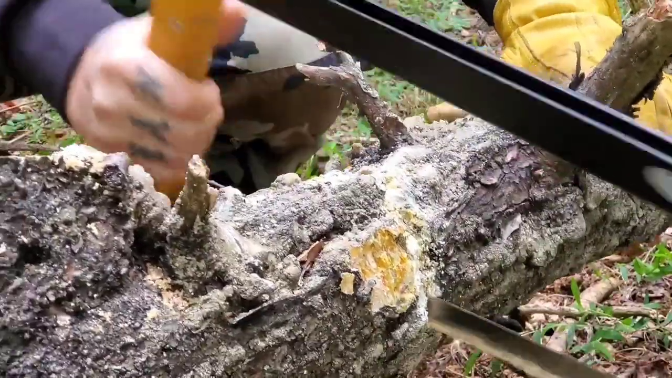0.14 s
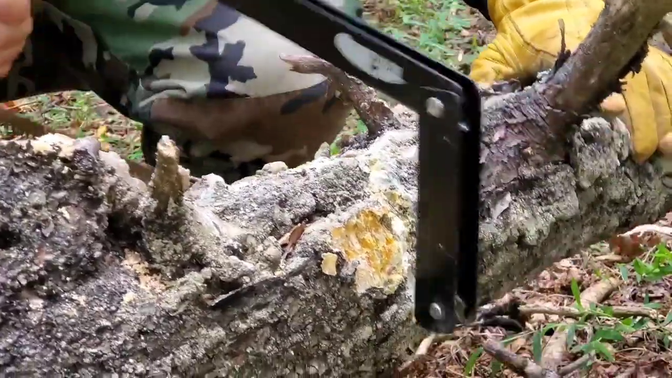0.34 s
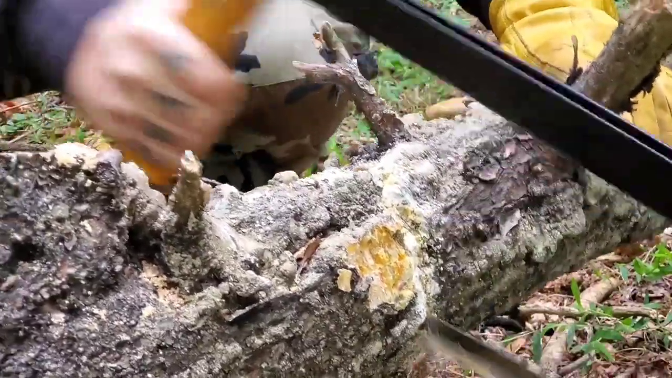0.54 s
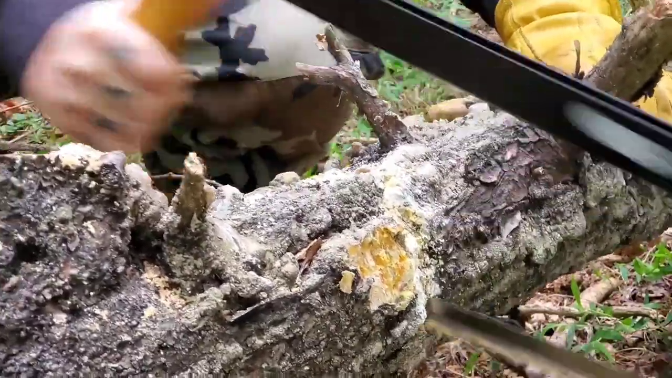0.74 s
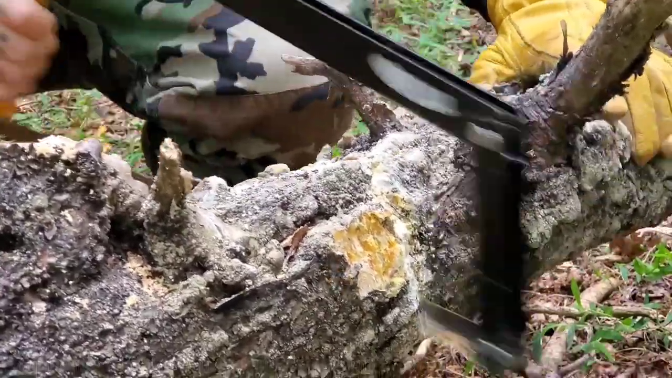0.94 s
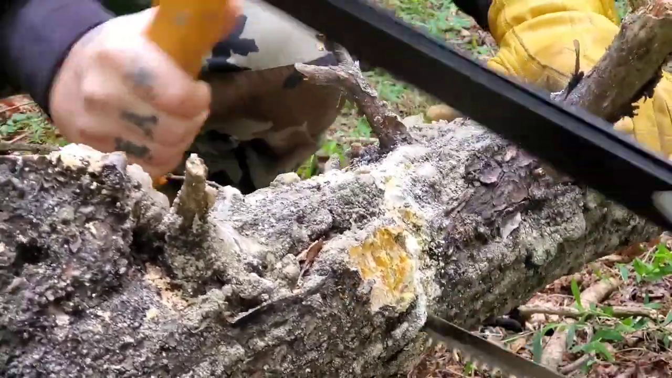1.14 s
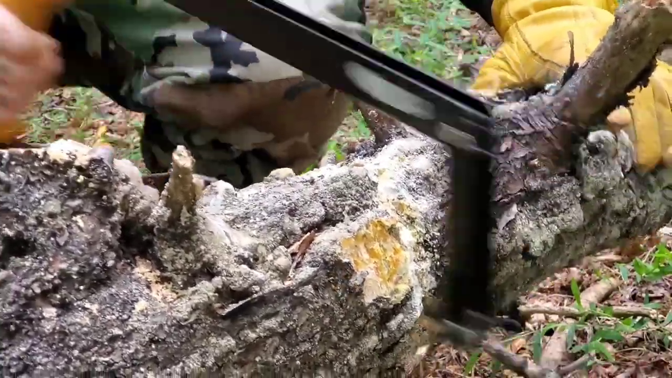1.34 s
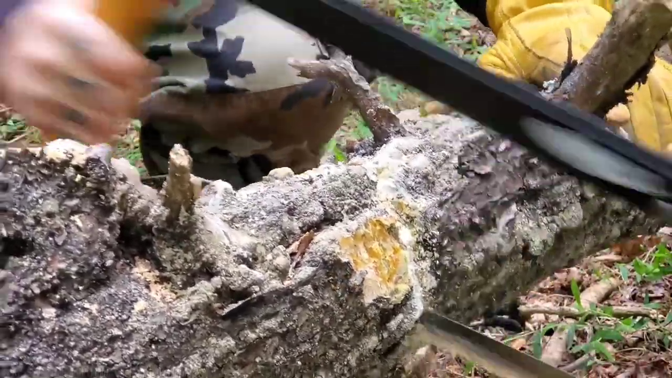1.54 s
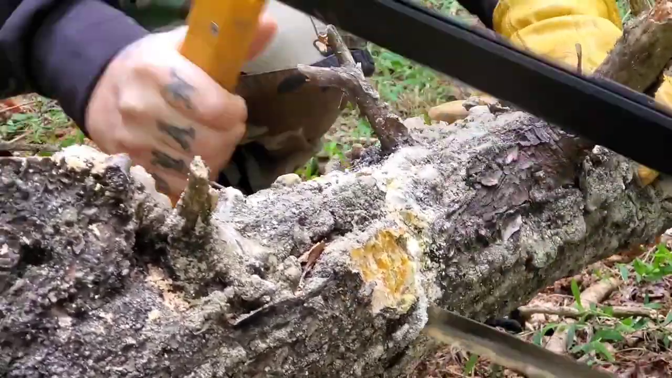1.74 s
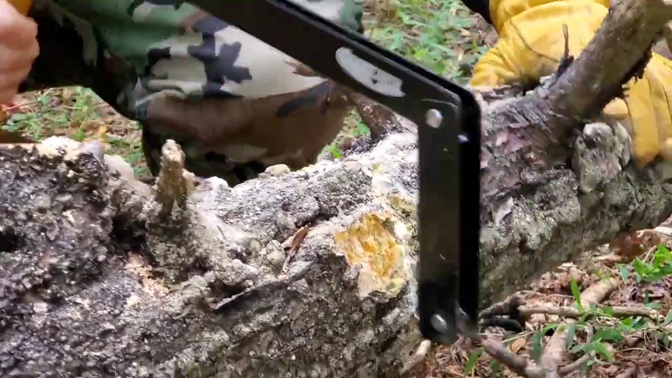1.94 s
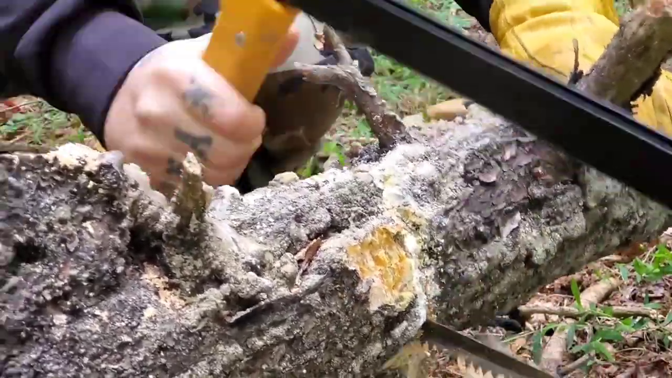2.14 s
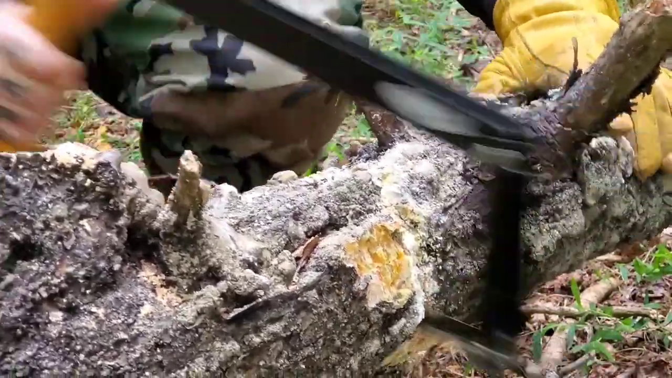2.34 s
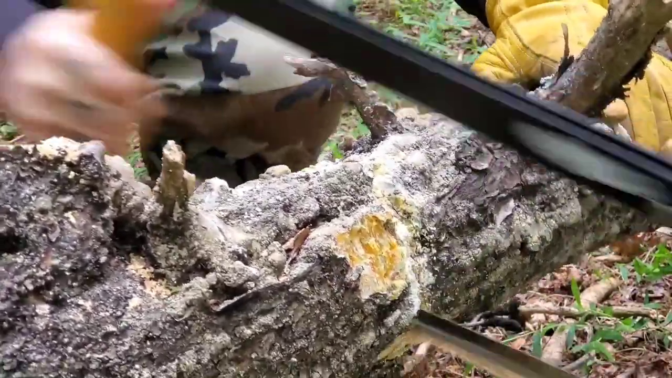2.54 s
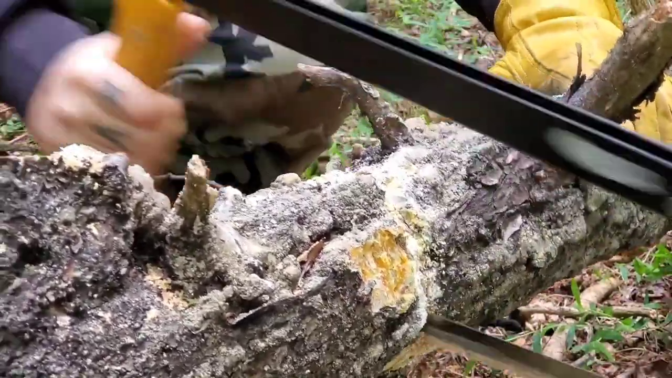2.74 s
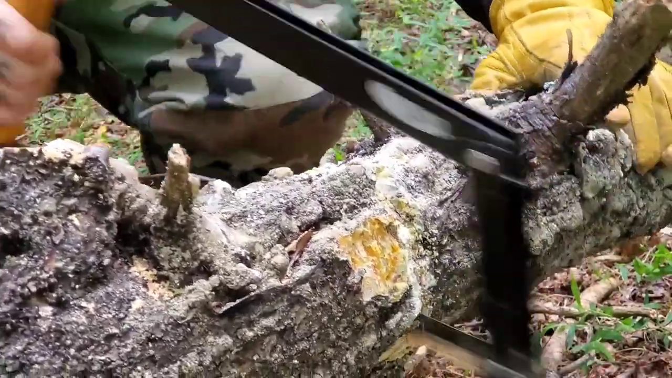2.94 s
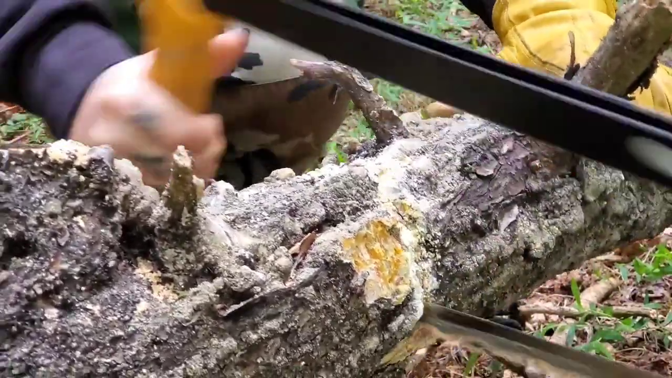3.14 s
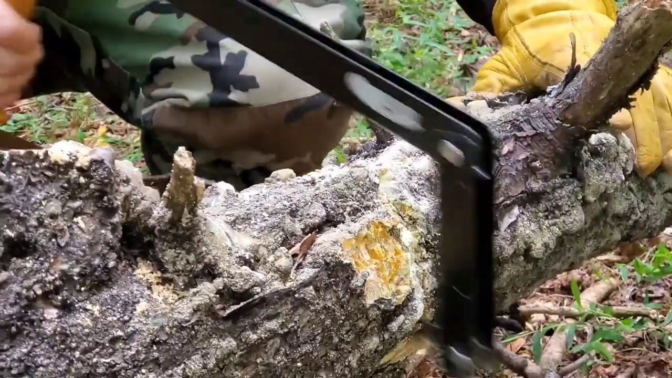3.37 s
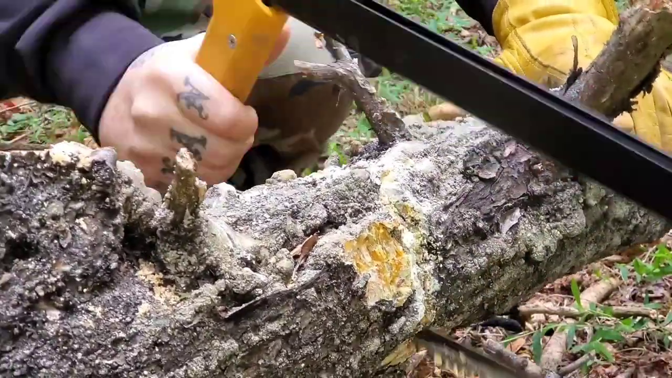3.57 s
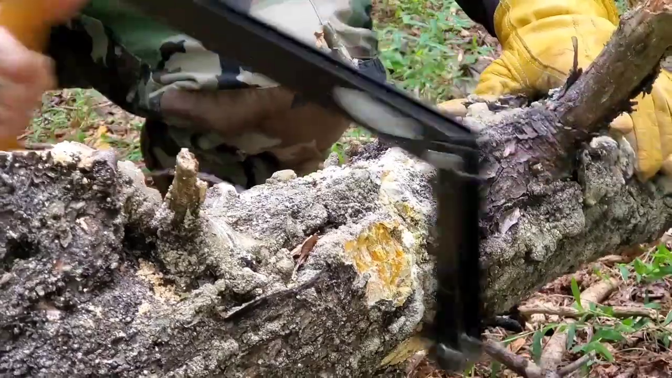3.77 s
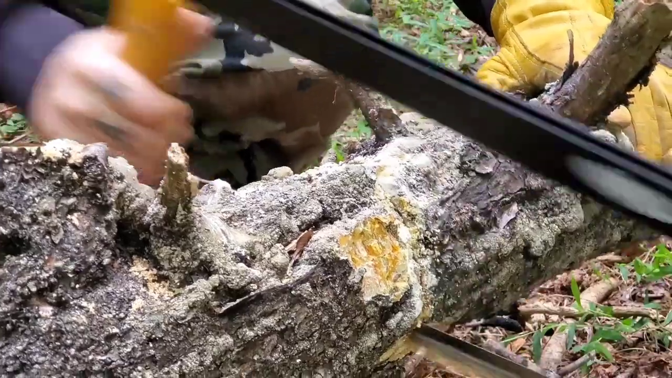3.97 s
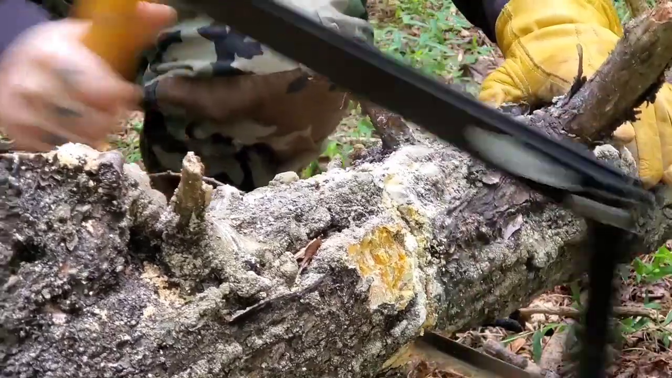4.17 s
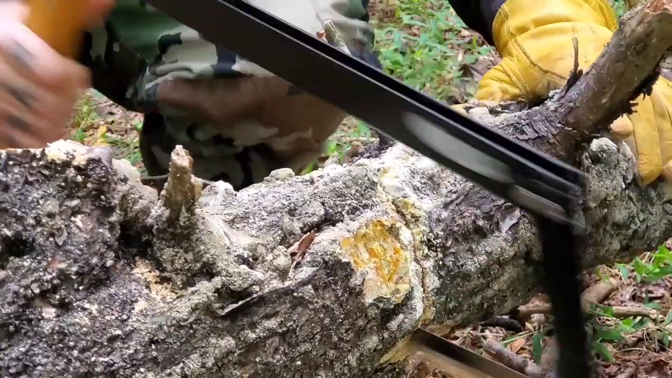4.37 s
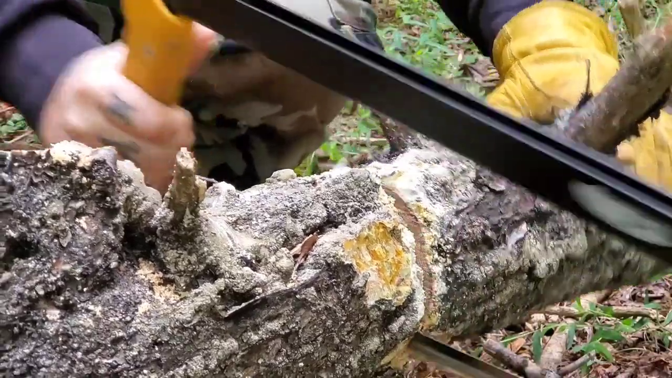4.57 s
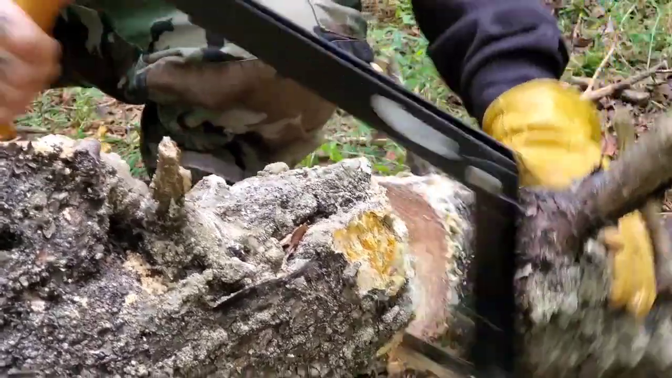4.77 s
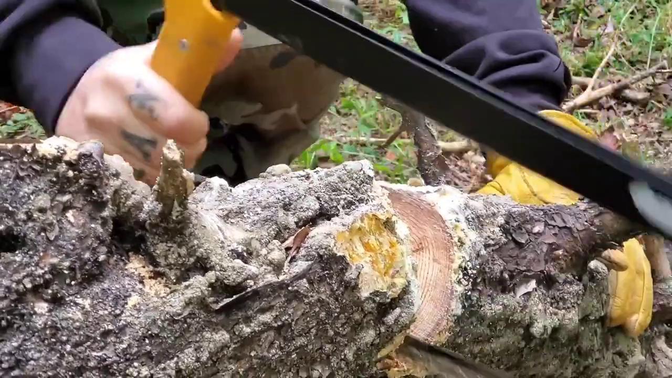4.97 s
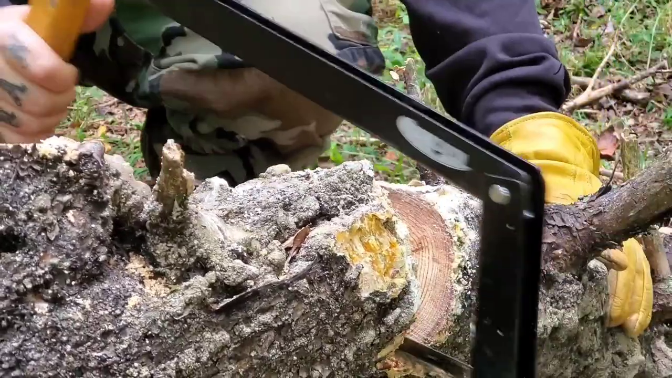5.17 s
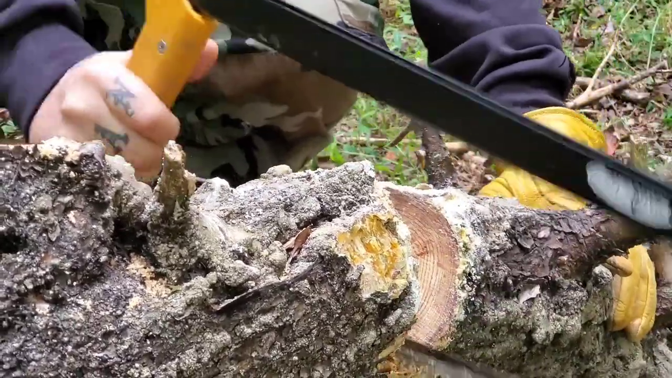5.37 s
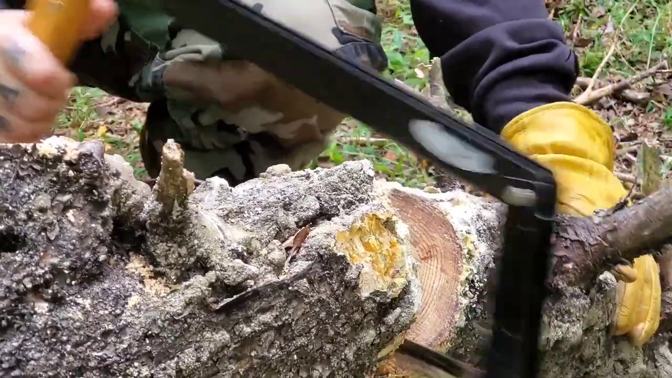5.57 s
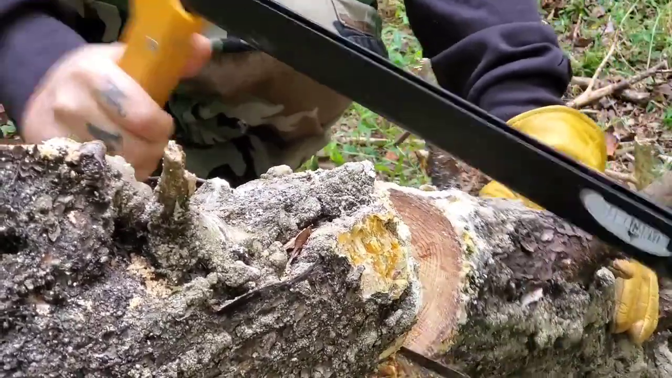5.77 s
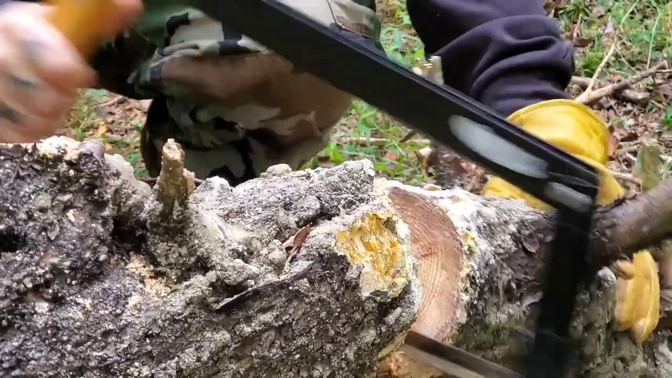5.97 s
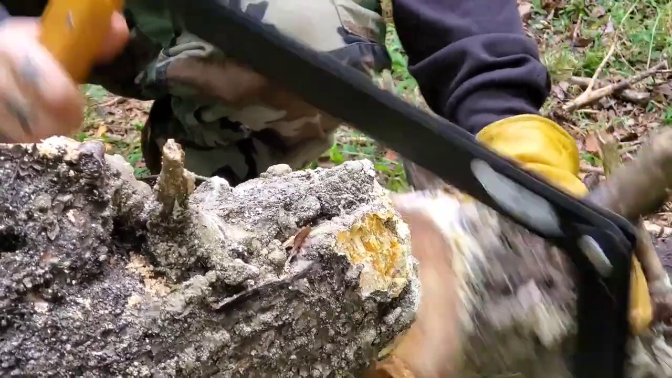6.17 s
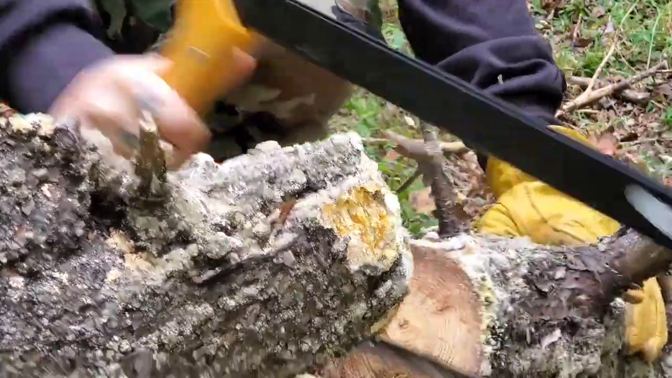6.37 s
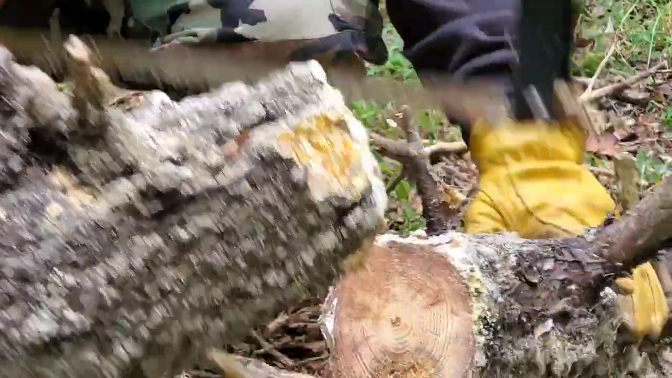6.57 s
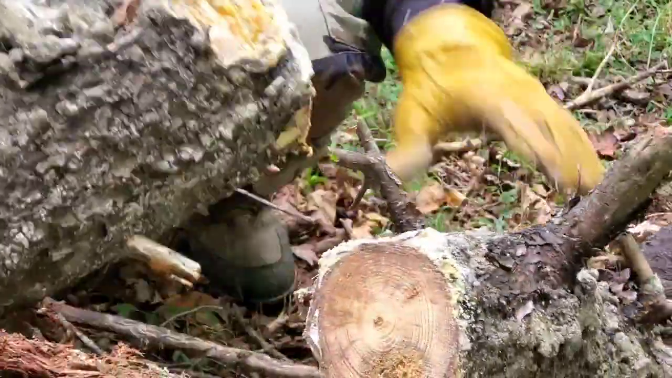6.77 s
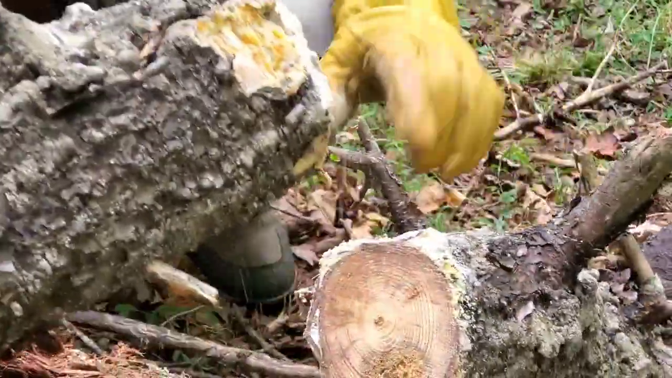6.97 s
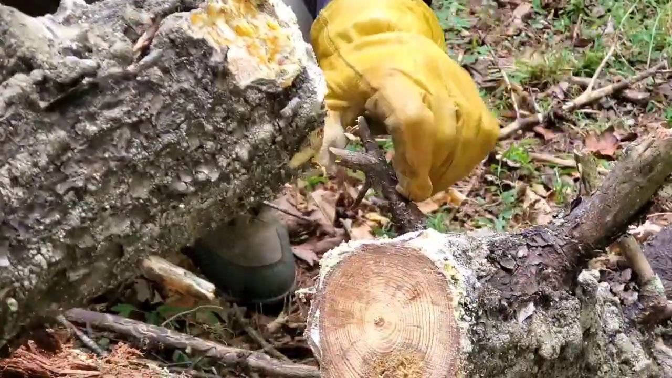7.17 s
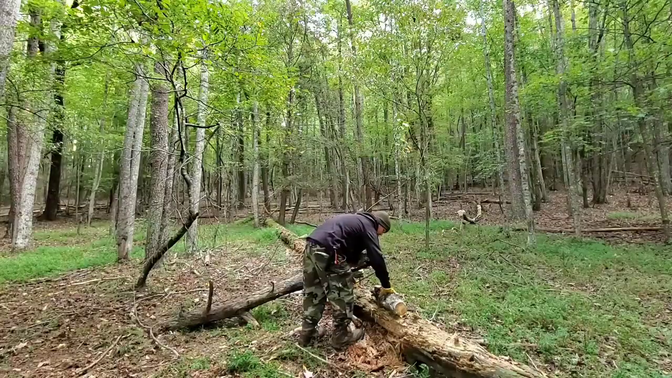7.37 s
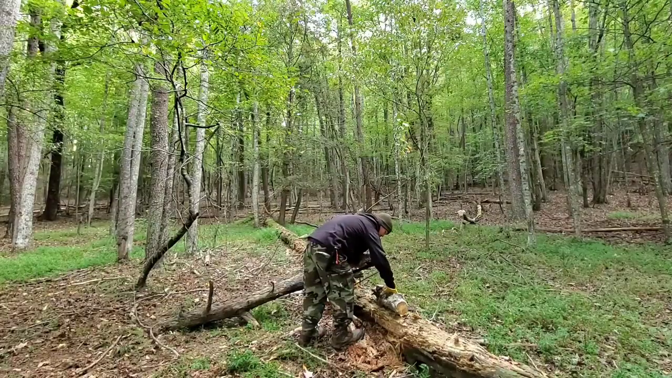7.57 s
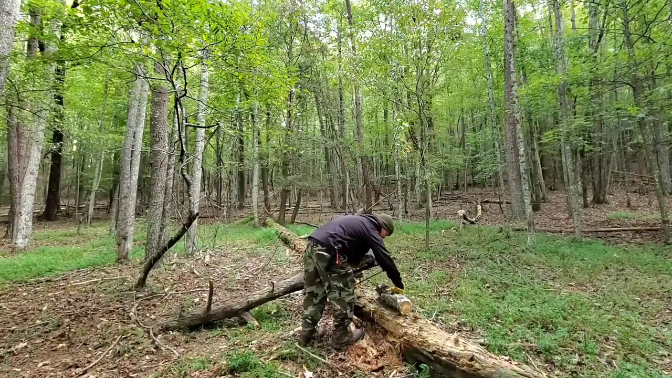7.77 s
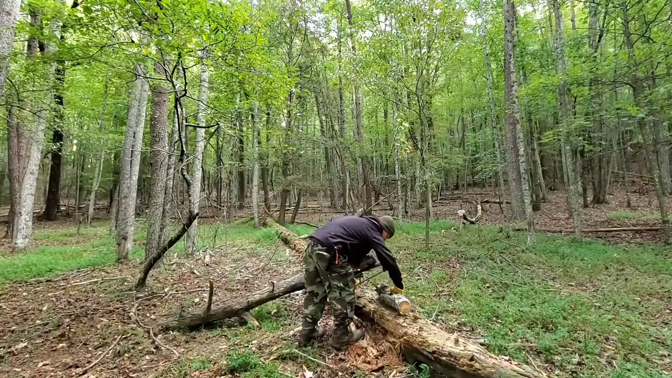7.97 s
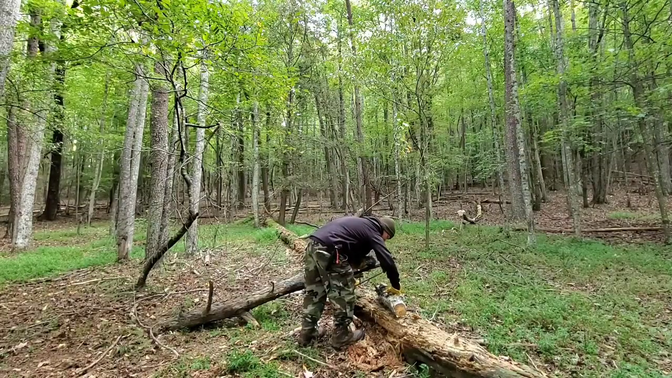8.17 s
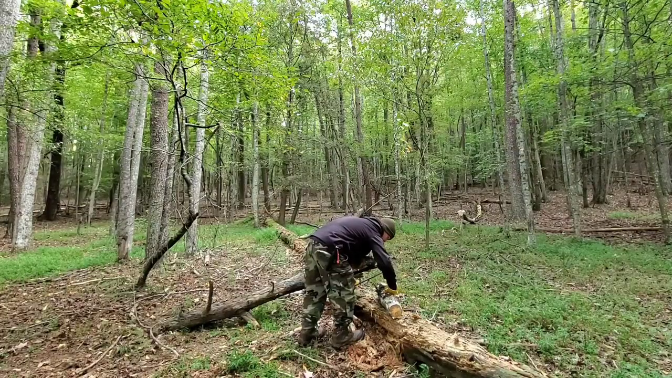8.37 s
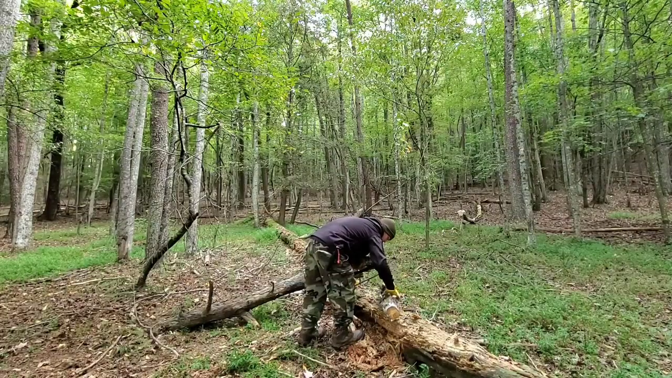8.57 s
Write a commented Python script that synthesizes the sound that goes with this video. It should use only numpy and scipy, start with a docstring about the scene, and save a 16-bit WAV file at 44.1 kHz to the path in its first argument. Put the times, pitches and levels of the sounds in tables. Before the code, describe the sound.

Close to the microphone, a bow saw cuts a log in brisk strokes, harsh and woody going forward, thin and faint coming back, with dull frame bumps between. Fibres groan and snap, the log cracks, and sawing continues more lightly. The saw comes free with a small clank, leaves rustle, twigs crack, and the still outdoor air remains with a tiny far bird chirp.

```python
"""A bow saw works through a fallen log in the woods, about two strokes each way a second.
Each stroke is a stream of tiny fibre clicks that excites resonances of log, kerf and steel blade.
The teeth bite going forward until the log sags, and otherwise skim; frame bumps ring damped modes.
Fibres groan and snap, the log cracks and sags, sawing goes on more lightly, and the freed saw clanks.
Leaves and twigs, heard as shaped noise, and a far bird, a gliding sine, remain in the still air."""
import sys
import numpy as np
from scipy import signal
from scipy.fft import rfft, irfft, next_fast_len
from scipy.io import wavfile

SR = 44100
rng = np.random.default_rng(int(sys.argv[2]) if len(sys.argv) > 2 else 0)


def master(y):
    """Save y as 16-bit WAV."""
    cut = np.clip(np.atleast_2d(y).T, -1, 1)
    pcm = np.round(cut * 32767)  # scale
    wavfile.write(sys.argv[1], SR, pcm.astype(np.int16))


N = 380141
FFT_SIZE = next_fast_len(N + 8000)
TIME, FREQS = np.arange(N) / SR, np.fft.rfftfreq(FFT_SIZE, 1 / SR)
TOOTH_HZ = 200.5   # teeth passing per second at full speed, before random wavering

# Strokes of the saw. Each row: start in seconds, length in seconds, growl of the wood in dB,
# rasp of the teeth in dB, swell from start to end in dB.
# Forward strokes:
PUSHES = [(0.024, 0.23, -22, -26.5, -0.5), (0.555, 0.21, -21, -24.5, -3.5),
          (1.073, 0.21, -21.5, -27.5, -2.5), (1.603, 0.23, -22, -24, -7.5), (2.128, 0.21, -22, -23, -1.5),
          (2.615, 0.21, -23, -25, 10), (3.086, 0.21, -23, -26, 12), (3.566, 0.22, -23.5, -25.5, -4),
          (4.035, 0.2, -22, -23, 2), (4.492, 0.2, -22.5, -25.5, 6), (4.935, 0.2, -28, -28, -3.5),
          (5.391, 0.18, -28, -29.5, 2), (5.806, 0.18, -25.5, -26.5, 8), (6.238, 0.25, -34.5, -34, -18)]
# Back strokes, teeth skimming; the last draws the blade free:
PULLS = [(0.242, 0.3, -38, -36.5, -2.5), (0.805, 0.27, -36, -35, -8.5), (1.322, 0.25, -36.5, -33, 11),
         (1.875, 0.27, -33, -31, -12.5), (2.359, 0.29, -33, -32, -6), (2.837, 0.27, -31, -30, -13.5),
         (3.309, 0.27, -32, -31.5, -8.5), (3.765, 0.28, -34, -30, -8.5), (4.2, 0.3, -35, -35.5, -6),
         (4.672, 0.29, -28.5, -25.5, 6), (5.14, 0.26, -36, -35.5, 4), (5.593, 0.24, -39, -36, 17),
         (6.036, 0.22, -32.5, -30.5, 8), (6.581, 0.12, -44, -32, -15)]
SAWING_END_S = PULLS[-1][0] + PULLS[-1][1]


def from_db(db):
    """Decibels are logarithmic: twenty per tenfold amplitude gain."""
    return 10 ** (np.asarray(db) / 20)


def rms_one(x):
    """Normalisation to unit mean power."""
    return x / np.sqrt(np.mean(x ** 2) + 1e-20)


def in_time(rows):
    """Linear interpolation of each column of a curve at every sample."""
    s, *columns = np.transpose(rows)
    return [np.interp(TIME, s, c) for c in columns]


def at_hz(points):
    """Interpolation of a spectrum along logarithmic frequency."""
    hz, value = np.transpose(points)
    return np.interp(np.log(FREQS + 1), np.log(hz), value)


def shaped(x, response):
    """Linear filtering: the spectrum is multiplied by a frequency response."""
    return irfft(rfft(x, FFT_SIZE) * response, FFT_SIZE)[..., :N]


def drift(rate):
    """Random modulation: chance values, rate per second, joined by lines and scaled to spread 1."""
    steps = TIME * rate
    return rms_one(np.interp(steps, np.arange(9000), rng.standard_normal(9000)))


def resonances(modes):
    """Parallel second-order resonators with alternating signs add up to one response."""
    total = 0
    for k, (hz, width, db) in enumerate(modes):
        damping = 1j * FREQS * width
        total = total + (-1) ** k * from_db(db) * damping / (hz ** 2 - FREQS ** 2 + damping)
    return total


def moving_resonance(x, hz, width_hz):
    """Heterodyning: a one-pole low-pass in a rotating frame is a resonator that follows a curve."""
    turn = np.exp(2j * np.pi * np.cumsum(hz) / SR)
    r = np.exp(-np.pi * width_hz / SR)
    return 2 * np.real(turn * signal.lfilter([1 - r], [1, -r], x / turn))


def two_ears(pair):
    """Interaural coherence: ears are alike in the bass, unlike in the treble, the right a little late."""
    # Each row: frequency in Hz, likeness of the two ears from 0 to 1.
    likeness = [(200, 0.94), (1400, 0.64), (2600, 0.6), (14000, 0)]
    right_lag_s = .000065
    alike = np.clip(at_hz(likeness), 0, 1)
    mid = shaped(pair[0], np.sqrt((1 + alike) / 2))
    side = shaped(pair[1], np.sqrt((1 - alike) / 2))
    right = shaped(mid - side, np.exp(-2j * np.pi * FREQS * right_lag_s))
    return np.array([mid + side, right])


def noise(spectrum):
    """Filtered white noise: stereo, coloured by a spectrum, of unit power."""
    white = two_ears(rng.standard_normal((2, N)))
    return rms_one(shaped(white, from_db(at_hz(spectrum))))


def struck(blows, modes, contact_hz):
    """Modal impact: each blow starts damped sines, and a soft contact dulls their treble."""
    out, t = np.zeros(N + SR), np.arange(SR) / SR
    hz, mode_db, t60 = np.array(modes).T[:, :, None]
    rings = np.sin(2 * np.pi * hz * t) * from_db(mode_db - 60 * t / t60)
    signs = (-1) ** np.arange(len(modes))
    for s, db in blows:
        # every blow excites the modes a little differently
        strengths = from_db(db + rng.normal(0, 3.4, len(modes))) * signs
        start = int(s * SR)
        out[start:start + SR] += strengths @ rings
    contact = signal.butter(1, contact_hz, fs=SR, output="sos")
    return signal.sosfilt(contact, out[:N] + 1e-18)


def bursts(rows, length_s, rise_s, tail_db, tail_s):
    """Powers of unrelated bursts add; each has a fainter exponential tail from the surroundings."""
    power, t = np.zeros(N + SR), np.arange(SR // 3) / SR
    body = np.exp(-(t / length_s) ** 2 / 2)
    tail = from_db(tail_db) * np.exp(-t / tail_s)
    shape = (1 - np.exp(-t / rise_s)) * (body + tail)
    for s, db in rows:
        start = int(s * SR)
        power[start:start + len(t)] += (from_db(db) * shape) ** 2
    return np.sqrt(power[:N])


def catches(per_s, decay_s, size_db):
    """Poisson jerks of uneven size, each relaxing exponentially, form an envelope."""
    sizes = from_db(size_db * np.minimum(rng.exponential(1, N), 2))
    jerks = (rng.random(N) < per_s / SR) * sizes
    return signal.lfilter([1], [1, -np.exp(-1 / (decay_s * SR))], jerks + 1e-18)


def forest_air():
    """Broadband noise at a steady level stands for still air among the trees."""
    # Each row: frequency in Hz, relative spectral level in dB.
    air_colour = [(59, -25.5), (100, -0.5), (306, -12.5), (697, -5.5), (2930, -12.5), (3850, -7.5),
                  (15500, -31.5)]
    return from_db(-66.5) * noise(air_colour)


def bird():
    """Frequency modulation: one thin sine glides and trembles as a far call."""
    # Each row: time in seconds, pitch in Hz, level in dB.
    call = [(8.535, 8470, -64), (8.57, 7880, -66), (8.62, 8250, -83)]
    hz, db = in_time(call)
    phase = 2 * np.pi * np.cumsum(hz * (1 + .006 * drift(400))) / SR
    return from_db(db) * (TIME > call[0][0]) * np.sin(phase)


def rocking():
    """Low-frequency noise follows the log as it rocks on the soil."""
    # Each row: time in seconds, level in dB before the gain below.
    rocking_level = [(0, -55), (3.2, -51.5), (5.2, -54.5), (7.1, -65.5), (8.4, -78.5)]
    # Each row: frequency in Hz, relative spectral level in dB.
    rumble_colour = [(20, -14.5), (55, -3.5), (95, -5), (250, -31.5)]
    gain_db = 1
    return from_db(in_time(rocking_level)[0] + gain_db) * noise(rumble_colour)


def frame_hum():
    """A single mode of the saw frame hums as a slightly unsteady low sine."""
    # Each row: time in seconds, RMS level in dB.
    hum_level = [(4.7, -96), (4.95, -58.5), (7.05, -59.5), (7.25, -88.5)]
    hum_hz = 63.6 * (1 + 0.0031 * drift(8.7))
    hum = np.sin(2 * np.pi * np.cumsum(hum_hz) / SR) * np.sqrt(2)
    return from_db(in_time(hum_level)[0]) * hum


def trees(x, wet_db=-27, t60=0.52, dull_hz=3500):
    """Diffuse reverberation: trunks scatter a faint, dull, decaying echo."""
    t = np.arange(SR) / SR
    onset = np.minimum(t / .02, 1)
    echo = rng.standard_normal((2, SR)) * from_db(-60 * t / t60) * onset
    echo /= np.sqrt(np.sum(echo ** 2, axis=1, keepdims=True))
    wet = signal.fftconvolve(x, echo, axes=1)[:, :N]
    return from_db(wet_db) * shaped(wet, 1 / (1 + 1j * FREQS / dull_hz))


def twigs():
    """Brittle fracture: twigs crack on the ground as brief bursts of noise."""
    # Each row: time in seconds, level in dB.
    cracks = [(6.937, -51), (7.205, -57), (7.847, -61), (8.104, -46), (8.201, -54.5), (8.272, -55),
              (8.303, -57), (8.398, -59)]
    # Each row: frequency in Hz, relative spectral level in dB.
    twig_colour = [(200, -14), (1100, 8), (3500, 0), (15000, -7)]
    return noise(twig_colour) * bursts(cracks, length_s=0.004, rise_s=.0001, tail_db=-9.0, tail_s=0.057)


def leaves():
    """Crumpling noise: dry leaves rustle in random clumps as the log is lifted, and stir once more."""
    # Each row: time in seconds, level in dB.
    rustle_level = [(6.65, -49.5), (6.75, -60.5), (6.87, -48), (6.98, -57.5), (7.4, -85), (7.57, -73),
                    (7.7, -82)]
    # Each row: frequency in Hz, relative spectral level in dB.
    leaf_colour = [(6000, -1.5), (15000, -4.5)]
    crumple = rms_one(.6 + catches(per_s=90, decay_s=.002, size_db=4.0))
    level = from_db(in_time(rustle_level)[0] + 0.87 * drift(90)) * (TIME > rustle_level[0][0])
    return level * crumple * noise(leaf_colour)


def bark_scrape():
    """Friction noise: the bark of the lifted log scrapes dully at a wavering level."""
    # Each row: time in seconds, level in dB.
    scrape_level = [(6.74, -64), (6.85, -53), (6.92, -63), (7.2, -95)]
    # Each row: frequency in Hz, relative spectral level in dB.
    scrape_colour = [(400, -14), (1050, -5), (3500, -18.5)]
    level = from_db(in_time(scrape_level)[0] + 1.7 * drift(70)) * (TIME > scrape_level[0][0])
    return level * noise(scrape_colour)


def groan(octave_db=0.5, rough=0.062):
    """Stick-slip of straining fibres just before the log sags: a rough tone and octave rise, then sink."""
    # Each row: time in seconds, pitch in Hz, level of the lower tone in dB.
    glide = [(4.52, 228, -59.5), (4.615, 274.7, -26.5), (4.68, 258, -43.5), (4.87, 218.8, -41.5),
             (4.9, 214, -100)]
    hz, db = in_time(glide)
    phase = 2 * np.pi * np.cumsum(hz * (1 + rough * drift(150))) / SR
    tones = np.sin(phase) + from_db(octave_db) * np.sin(2 * phase)
    return from_db(db + 2.4 * drift(60)) * (TIME > glide[0][0]) * tones


def fibre_snaps():
    """Sudden release of strain: fibres snap as very short bursts of bright noise."""
    # Each row: time in seconds, level in dB.
    snap_times = [(4.631, -7.5), (4.701, -16), (6.335, -10), (6.351, -5)]
    # Each row: frequency in Hz, relative spectral level in dB.
    snap_colour = [(200, -12.5), (1200, -2), (3200, 3), (6000, 1.5), (16000, -9)]
    return noise(snap_colour) * bursts(snap_times, length_s=.0008, rise_s=.0001, tail_db=-24.0, tail_s=0.0089)


def steel_knocks():
    """Modal impact of steel: a tooth lets go with a sharp tick, and the freed saw clanks on the log."""
    # Each row: time in seconds, level in dB.
    tick_times = [(3.763, -15), (5.481, -10.5), (6.335, -10.5)]
    clank_times = [(6.613, -40), (6.631, -39)]
    # Each row: frequency in Hz, relative level in dB, decay by 60 dB in seconds.
    tick_modes = [(2840, -4.5, 0.0067), (3620, -5, 0.01), (5300, -9, 0.0077)]
    clank_modes = [(2000, -5, 0.19), (2584, -4, .16), (3750, -10, .09), (4172, -15, 0.12), (5400, -19, .15)]
    ticks = struck(tick_times, tick_modes, contact_hz=9100)
    return ticks + struck(clank_times, clank_modes, contact_hz=9000)


def log_blows():
    """Modal impact of wood: frame bumps and the breaking log ring damped modes and crush bark."""
    # Bumps on the log, the last as sawing ends; the log breaks and sags late in the cut.
    # Each row: time in seconds, level in dB.
    bumps = [(.481, -19), (1.013, -16), (1.523, -17), (2.575, -20), (3.044, -17), (3.521, -26),
             (3.977, -17), (6.612, -38)]
    breaks = [(4.841, -27), (4.885, -8.5)]
    # Each row: frequency in Hz, relative level in dB, decay by 60 dB in seconds.
    bump_modes = [(144, -18.5, 0.6), (372.5, -15, 0.17), (575, -7, 0.055), (701, -9, 0.04),
                  (907, -8, 0.049), (2000, -23, 0.23)]
    break_modes = [(202, -11.5, 0.17), (357, -8.5, 0.12), (534, -14.5, 0.15), (810, -14, 0.073),
                   (1110, -9, 0.037)]
    # Crushed bark. Each row: frequency in Hz, relative spectral level in dB.
    bark_colour = [(25, -18), (60, -5.5), (800, -1), (1500, -10.5), (7000, -27)]
    thuds = struck(bumps, bump_modes, contact_hz=6000) + struck(breaks, break_modes, contact_hz=4020)
    blows = list(bumps) + list(breaks)
    crush = bursts(blows, length_s=0.0011, rise_s=0.0001, tail_db=-3.5, tail_s=0.013)
    return thuds + from_db(-3.0) * noise(bark_colour) * crush


def arm():
    """Reciprocating motion: place of the blade (0-1), its speed within each stroke, and its bite."""
    # Forward strokes, biting until the log sags. Each row: time in seconds, depth of bite from 0 to 1.
    forward_bite = [(4.6, 0.9), (4.9, 0)]
    starts = [row[0] for row in list(PUSHES) + list(PULLS)]
    turns = np.sort(starts + [SAWING_END_S])
    angle = np.pi * np.interp(TIME, turns, np.arange(len(turns)))
    swing = np.sin(angle)   # positive going forward
    place = (1 - np.cos(angle)) / 2
    bite = np.where(swing > 0, in_time(forward_bite)[0], .08)   # the teeth skim on the way back
    return place, np.abs(swing) ** .6, np.clip(bite, 0, 1)


def strokes(rows, attack_s, release_s):
    """Amplitude envelopes of growl and rasp: each stroke eases in, swells or slackens, and eases out."""
    out = np.zeros((2, N))
    for s, length, growl_db, rasp_db, swell_db in rows:
        now = (TIME > s) & (TIME < s + length)
        t = TIME[now] - s
        ease_in = np.sin(np.pi / 2 * np.minimum(t / attack_s, 1))
        ease_out = np.sin(np.pi / 2 * np.minimum((length - t) / release_s, 1))
        swell = from_db(swell_db * (t / length - .5))
        out[:, now] += from_db([[growl_db], [rasp_db]]) * (ease_in * ease_out) ** 2 * swell
    return out


def effort():
    """Power sum of strokes and a faint rub gives growl and rasp in dB, under an unsteady hand."""
    work = strokes(PUSHES, attack_s=0.072, release_s=0.064) + strokes(PULLS, attack_s=.12, release_s=0.1)
    rub = from_db(-55.5) * (TIME < SAWING_END_S)   # the blade still rubs in the kerf at the turns
    return 20 * np.log10(np.hypot(work, rub) + 1e-9) + 1.47 * drift(55)


def tooth_snags(rasp_db):
    """Stick-slip of teeth: listed snags and random catches, which follow the rasp, add in power."""
    # Teeth catch and skid. Each row: time in seconds, relative level in dB.
    snag_times = [(.052, -26), (.481, -30), (.73, -21), (1.034, -24), (1.278, -30.5), (1.46, -21),
                  (1.626, -31.5), (1.828, -34), (2.171, -23.5), (2.987, -23.5), (3.365, -27),
                  (3.413, -23.5), (3.598, -40), (4.152, -18), (4.514, -30.5), (4.628, -18.5),
                  (4.736, -28.5), (4.885, -17.5), (5.181, -37), (5.824, -27.5), (6.069, -33.5),
                  (6.152, -20.5), (6.53, -45.5), (6.613, -31)]
    catch_db = 1.5   # relative to the rasp
    skids = bursts(snag_times, length_s=0.0071, rise_s=0.00025, tail_db=-26.5, tail_s=0.057)
    single_teeth = catches(per_s=70, decay_s=.0018, size_db=4.2)
    return np.hypot(skids, from_db(rasp_db + catch_db) * single_teeth)


def tearing(speed, fibres_per_s, size_db, tooth_db, judder_db, judder_hz):
    """Granular fracture: tiny fibre clicks bunch at each passing tooth while the blade judders."""
    teeth = np.cumsum(TOOTH_HZ * speed * (1 + 0.0661 * drift(60))) / SR
    force = from_db(tooth_db * np.cos(2 * np.pi * teeth) + judder_db * drift(judder_hz))
    torn = rng.random((2, N)) < fibres_per_s * (.4 + speed) / SR
    sizes = from_db(size_db * np.minimum(rng.exponential(1, (2, N)), 4))
    clicks = torn * sizes * rng.choice([-1, 1], (2, N))
    # the division roughly offsets the power of the denser clicks at speed
    return rms_one(two_ears(clicks * force / np.sqrt(0.36 + speed)))


def along_blade(x, place, near_s, travel_s, reflection, scatter):
    """Comb filtering: waves return from the blade's end and scatter in the kerf along changing paths."""
    late = TIME - near_s - travel_s * (place + drift(2) / 2)
    fine = signal.resample_poly(x, 2, 1, axis=1)   # finer steps for the moving delay
    back = np.array([np.interp(late, np.arange(2 * N) / (2 * SR), ear) for ear in fine])
    longest_path_s, shifts_per_s = .005, 9
    lags = (rng.uniform(.05, 1, 10) * longest_path_s * SR).astype(int)
    scattered = sum(np.roll(x, lag, axis=1) * np.tanh(drift(shifts_per_s)) for lag in lags)
    return rms_one(x + reflection * back + scatter * scattered)


def singing(growl_db, t60=.35, waver_db=4.0):
    """Energy storage: each stroke feeds the taut blade, whose modes ring on into the turn."""
    # Each row: frequency in Hz, relative level in dB.
    blade_modes = [(1879, -9), (2148, 1.5), (2830, -14)]
    # Each row: time in seconds, gain of the free ringing in dB.
    ring_level = [(0, -15), (2.5, -18.5), (5.2, -15)]
    keep = from_db(-120 / (t60 * SR))   # share of energy kept per sample
    stored = np.sqrt(signal.lfilter([1 - keep], [1, -keep], from_db(growl_db) ** 2))
    tones = np.zeros(N)
    for hz, db in blade_modes:
        level = from_db(db + waver_db * drift(22))
        flexed_hz = hz + 4.5 * drift(40)   # the pitch wavers as the blade flexes
        tones += level * np.sin(2 * np.pi * np.cumsum(flexed_hz) / SR)
    return from_db(in_time(ring_level)[0]) * stored * tones


def rasp(place, speed, rasp_db, snags, hiss_db=0.6, zing_db=-1, snag_db=1.0):
    """Friction excitation: the bright scrape of steel in the kerf flares where teeth catch."""
    # Each row: frequency in Hz, relative spectral level in dB.
    teeth_colour = [(1500, -13), (2900, -9), (4100, 5.5), (5000, -1), (7000, 0.5), (10400, -3), (11800, -1),
                    (14000, 1), (15500, -2)]
    # Thin treble resonances of the blade. Each row: frequency in Hz, width in Hz, relative level in dB.
    zing_modes = [(6770, 140, 1), (11850, 110, 4.5)]
    level = np.hypot(from_db(rasp_db + hiss_db), from_db(snag_db) * snags)
    scrape = tearing(speed, fibres_per_s=11000, size_db=1.5, tooth_db=0.1, judder_db=1.14, judder_hz=174.0)
    drive = level * along_blade(scrape, place, near_s=0.000909, travel_s=0.00011, reflection=.33, scatter=.33)
    zing = from_db(zing_db) * np.abs(resonances(zing_modes))
    return shaped(drive, rms_one(np.hypot(from_db(at_hz(teeth_colour)), zing)))


def tooth_beat(speed, bite, growl_db, beat_db=-19):
    """Tooth-passing tone: its pitch and level rise and fall with the speed of the arm."""
    phase = 2 * np.pi * np.cumsum(TOOTH_HZ * speed * (1 + .1 * drift(120))) / SR
    return from_db(growl_db + beat_db) * np.sqrt(bite) * speed * np.sin(phase)


def wood(place, speed, bite, growl_db, snags, snag_db=-7, skim_db=-1.5, bite_db=-12, log_width_hz=105):
    """Source and resonator: tearing drives log, kerf and blade; deep bites bring out loaded modes."""
    # Each row: frequency in Hz, relative spectral level in dB.
    wood_colour = [(50, -35.5), (160, -0.5), (280, -11), (420, -5.5), (700, -4), (960, -7), (1200, -5),
                   (2200, 1.5), (2900, -2.5), (3500, -2.5), (5000, -31.5)]
    # The cut deepens. Each row: time in seconds, note of the log in Hz,
    # its relative level in dB, relative level of the kerf in dB.
    deepening_cut = [(.65, 560, 13.5, -1), (1.17, 657, 13, -8.5), (2.23, 547, 13, 2), (3.1, 550, 13.5, 6),
                     (4.13, 474, 14, 2)]
    # Kerf and blade under a deep bite, then the blade's broad ring at any load.
    # Each row: frequency in Hz, width in Hz, relative level in dB.
    kerf_modes = [(1126, 170, 5.5), (1520, 320, 12.5)]
    loaded_blade_modes = [(2452, 30, 21.5), (2590, 26, 19), (2813, 30, 15), (2040, 36, 12)]
    blade_body = [(2572, 330, -3.5)]

    fibres = tearing(speed, fibres_per_s=4500, size_db=2.5, tooth_db=2.5, judder_db=2.0, judder_hz=164.5)
    paths = along_blade(fibres, place, near_s=0.002195, travel_s=.0005, reflection=0.23, scatter=0.13)
    drive = np.hypot(from_db(growl_db), from_db(snag_db) * snags) * paths
    colour = from_db(at_hz(wood_colour))
    drive = drive / np.sqrt(np.mean(colour ** 2))

    skimming = from_db(skim_db) * shaped(drive * np.sqrt(1 - bite), colour)
    loaded = from_db(bite_db) * np.roll(drive, SR // 400, axis=1) * np.sqrt(bite)   # 2.5 ms later
    log_hz, log_db, kerf_db = in_time(deepening_cut)
    log_note = from_db(log_db) * moving_resonance(loaded, log_hz, log_width_hz)
    kerf = shaped(from_db(kerf_db) * loaded, resonances(kerf_modes))
    blade = shaped(loaded, resonances(loaded_blade_modes)) + shaped(drive, resonances(blade_body))
    return skimming + log_note + kerf + blade + tooth_beat(speed, bite, growl_db)


def scene():
    """Superposition: the saw and the log close by, the woods around."""
    place, speed, bite = arm()
    growl_db, rasp_db = effort()
    snags = tooth_snags(rasp_db)
    saw = wood(place, speed, bite, growl_db, snags) + rasp(place, speed, rasp_db, snags) + singing(growl_db)
    knocks = log_blows() + steel_knocks() + fibre_snaps() + twigs()
    near = saw + knocks + groan() + leaves() + bark_scrape()
    return near + trees(near) + rocking() + frame_hum() + forest_air() + bird()


def record(dry):
    """Band-limiting and saturation: a small microphone loses deep bass, rounds peaks, cuts the top."""
    dry = signal.sosfilt(signal.butter(3, 36, "high", fs=SR, output="sos"), dry)
    dry = np.tanh(dry / .75) * .75
    steep_cut = signal.ellip(10, .2, 75, 15700, fs=SR, output="sos")   # edge at 15700 Hz
    return signal.sosfilt(steep_cut, dry)


dry = scene()
out = record(dry)
master(out)
```